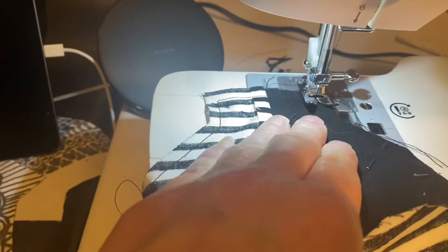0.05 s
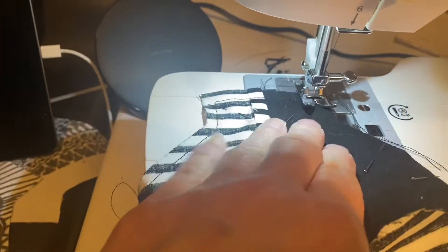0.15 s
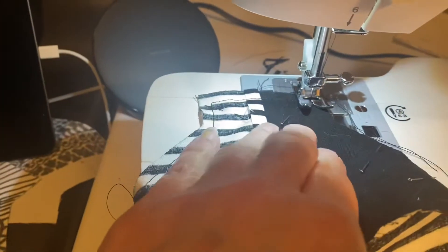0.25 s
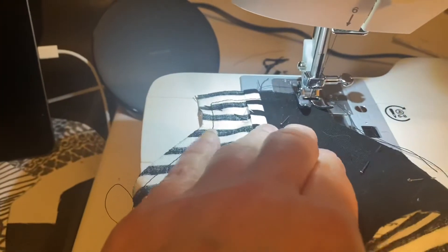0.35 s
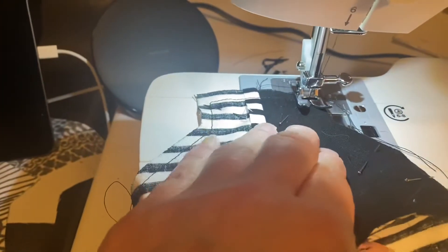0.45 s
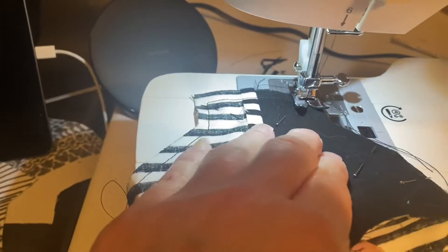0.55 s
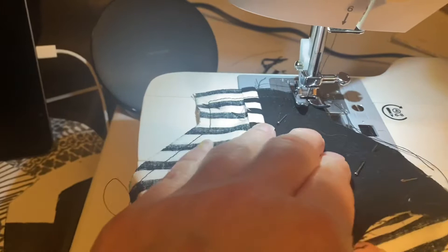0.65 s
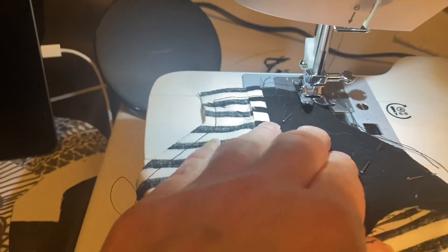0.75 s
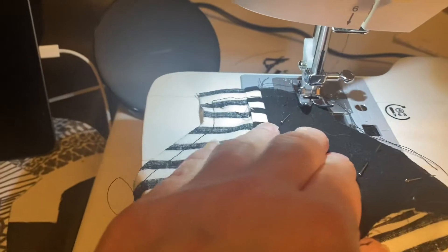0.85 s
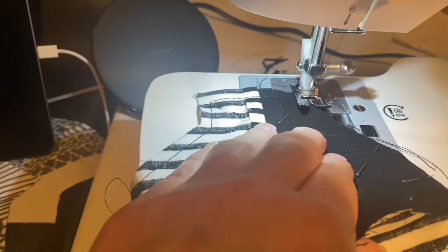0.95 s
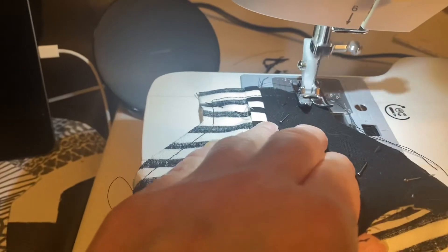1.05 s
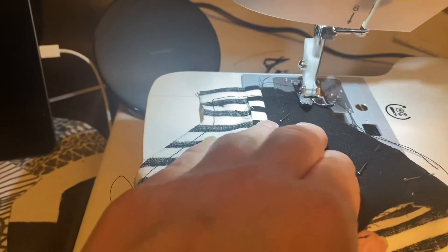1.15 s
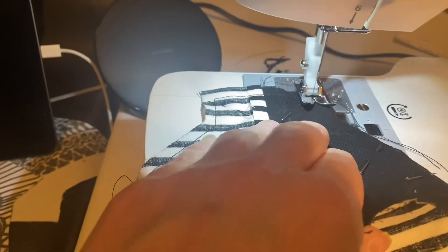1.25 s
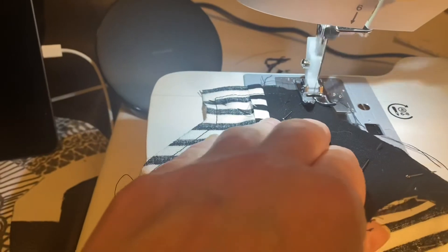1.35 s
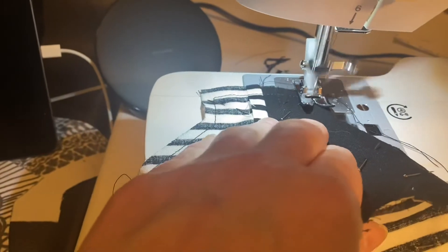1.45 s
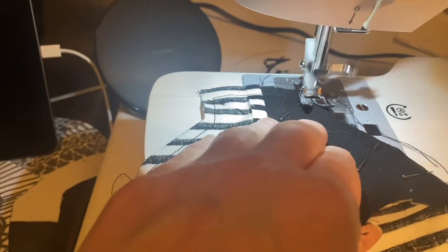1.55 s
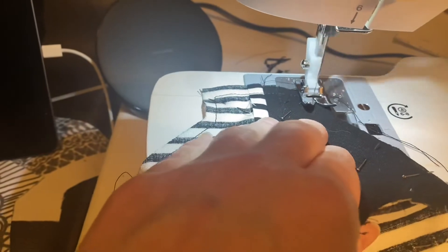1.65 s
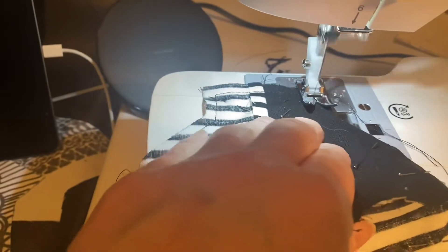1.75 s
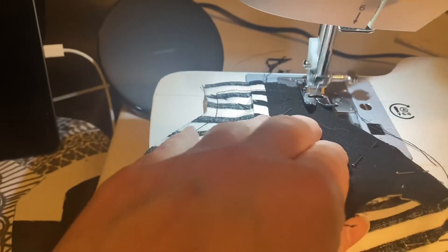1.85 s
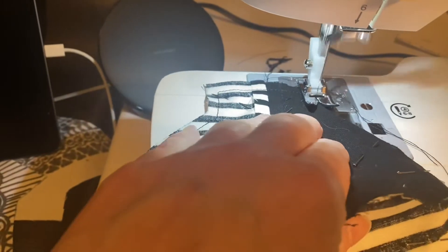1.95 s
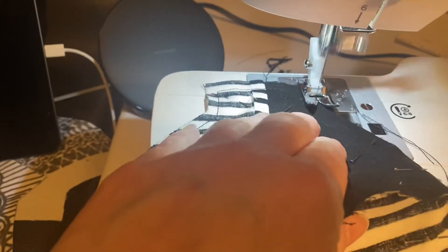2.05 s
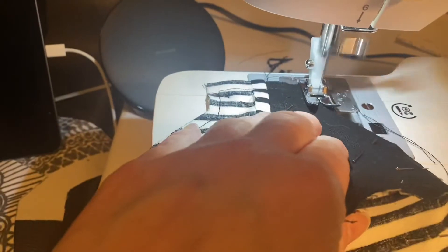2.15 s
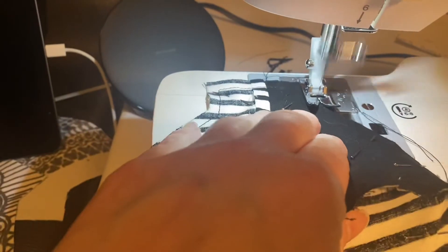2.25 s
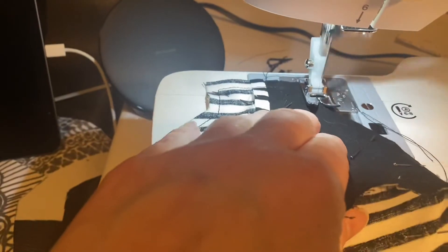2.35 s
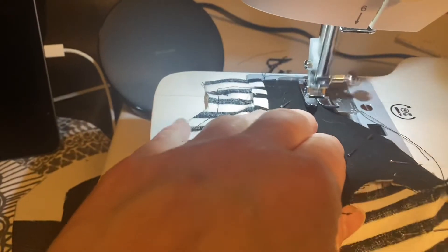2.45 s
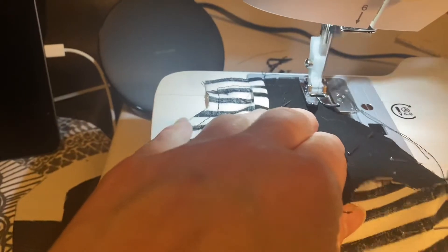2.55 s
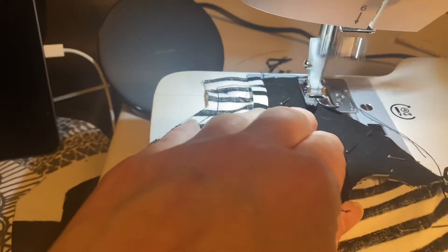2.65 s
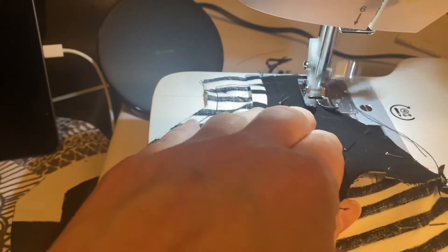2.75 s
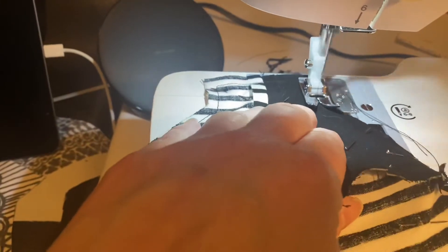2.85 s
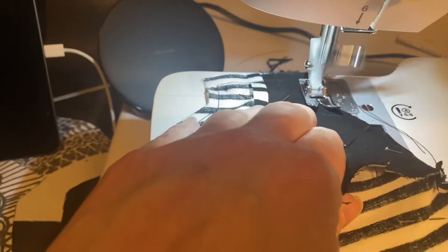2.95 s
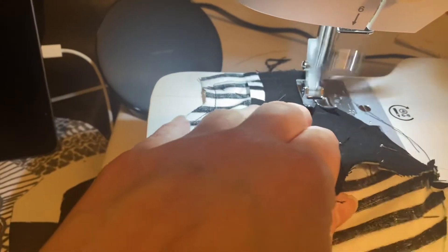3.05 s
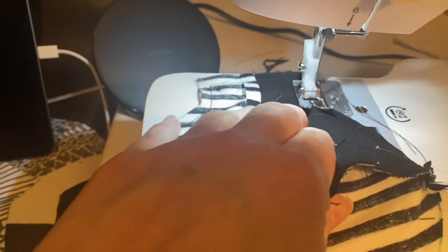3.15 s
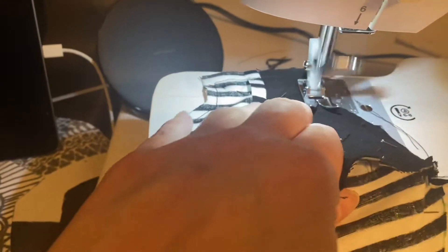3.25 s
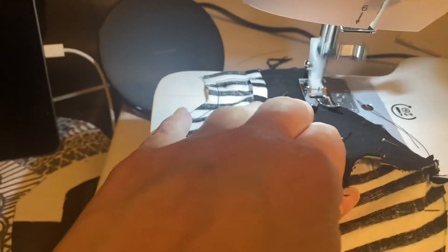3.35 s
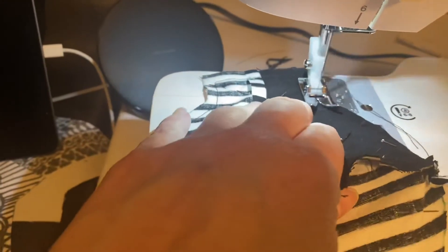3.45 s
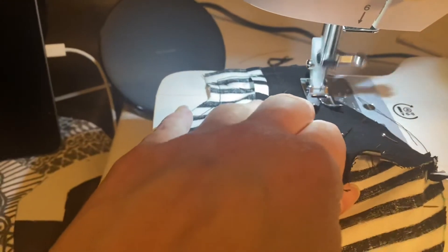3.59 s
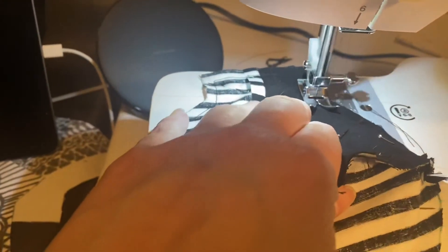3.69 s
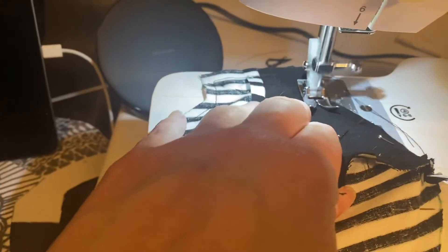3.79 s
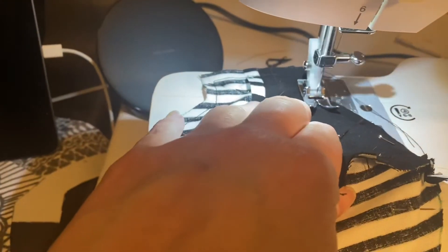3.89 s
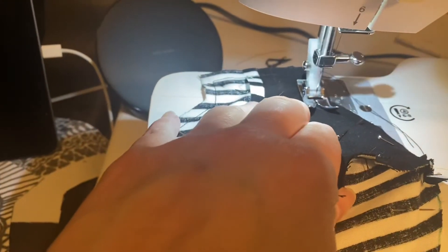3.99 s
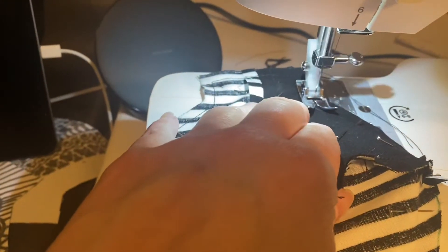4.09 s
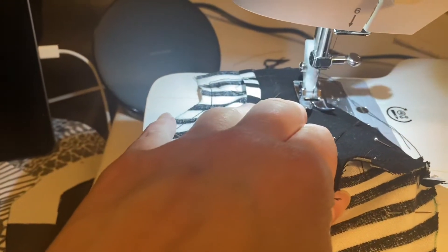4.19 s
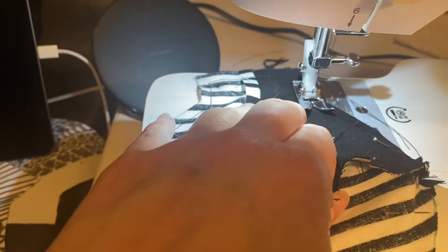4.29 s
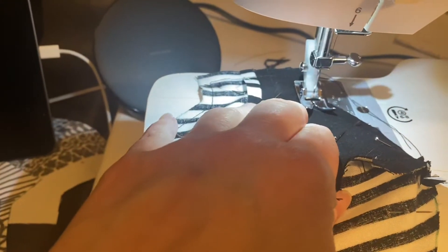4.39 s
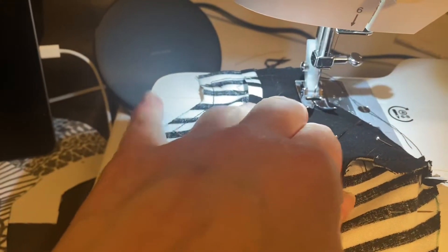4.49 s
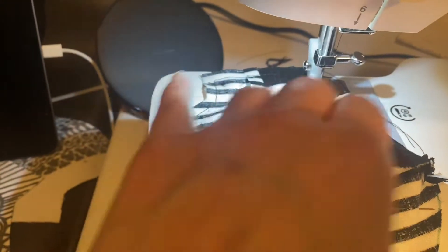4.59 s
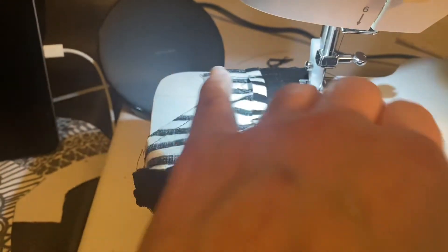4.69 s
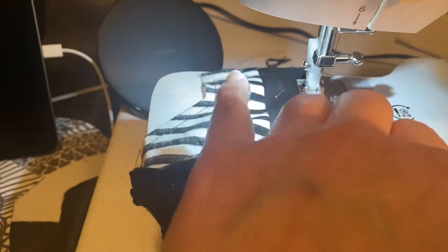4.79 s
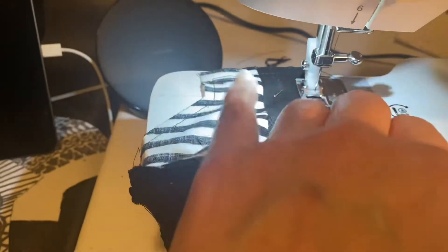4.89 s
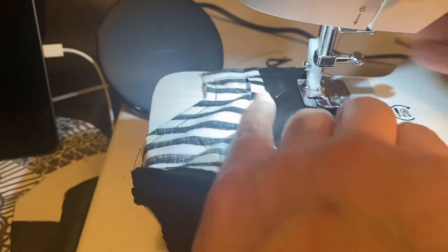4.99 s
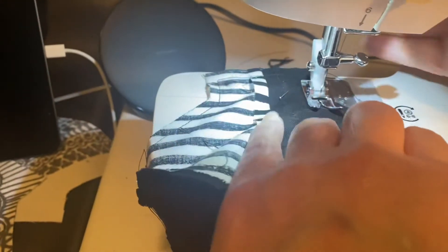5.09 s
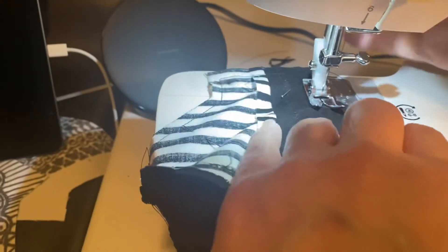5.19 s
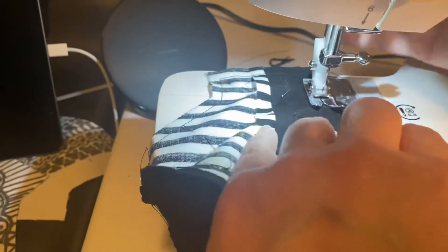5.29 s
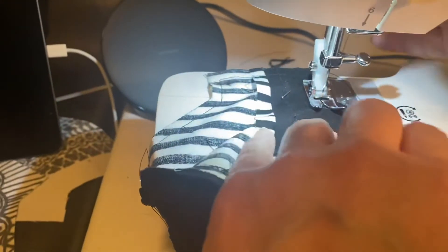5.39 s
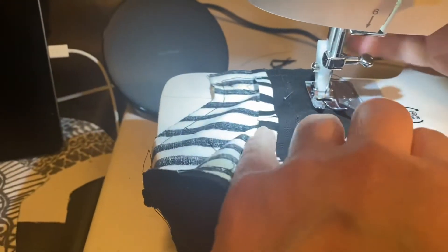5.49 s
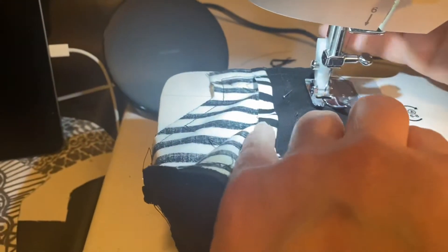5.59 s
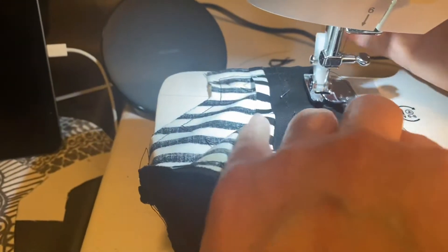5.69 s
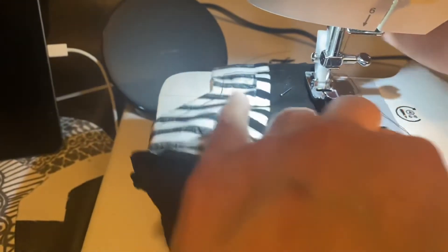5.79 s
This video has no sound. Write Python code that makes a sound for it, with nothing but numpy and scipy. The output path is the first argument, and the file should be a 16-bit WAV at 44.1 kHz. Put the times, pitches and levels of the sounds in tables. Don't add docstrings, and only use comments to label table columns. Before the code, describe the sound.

A domestic sewing machine on a table, heard very near through a phone in stereo. After brief fabric scuffs and a clunk, the motor speeds up with whining gears, buzzing housing and regular mechanical clacks, holds fast briefly, then drops in pitch and stops. Near quiet returns, broken by dull knocks, bright metallic clicks and cloth being handled.

```python
import sys
import numpy as np
from scipy import signal
from scipy.fft import rfft, irfft, next_fast_len
from scipy.io import wavfile
from scipy.ndimage import uniform_filter1d

SR = 44100
rng = np.random.default_rng(int(sys.argv[2]) if len(sys.argv) > 2 else 0)


def how_loud(loudness_db):
    steps = np.asarray(loudness_db, float) / 20
    return 10 ** steps


def master_out(mix):
    frames = np.transpose(np.atleast_2d(mix))
    ceiling = np.clip(frames, -1, 1)
    pcm = np.round(ceiling * 32767).astype(np.int16)
    wavfile.write(sys.argv[1], SR, pcm)


N = 257278

# (time [s], belt tooth rate [Hz])
SPEED_HZ = [(0.6, 80), (0.9, 185), (1.33, 325), (1.62, 345), (1.75, 415), (1.9, 505), (2.02, 645),
            (2.15, 726), (2.37, 779), (2.52, 808), (2.68, 822), (2.88, 819), (2.97, 768), (3.12, 558),
            (3.22, 462), (3.32, 425), (3.6, 208.5), (3.75, 115)]
# (multiple of tooth rate, mains sideband [Hz], level [dB])
BELT_LINES = [(1, 0, 4.5), (1, -60, -9), (1, 120, -9), (.69, 0, -7.5)]
GEAR_LINES = [(1, 120, -7), (1, -60, -1), (2, 0, -3), (2.445, -2, -6), (2.573, 1, 2.5), (2.573, 121, -12),
              (3.37, 0, -4), (3.37, -120, -11)]
# (level [dB], slope [dB per dB of speed], load swing [dB], flutter [dB], rise [s])
HUM = [(-48, 0.12, 5.0, 3.0, 0.35), (-46, 0.08, 1.0, 0.8, 0.08), (-57, .1, 1, 1.5, .05),
       (-60, .1, 1, 1.5, .05)]
# (frequency [Hz], width [Hz], gain [dB])
ARM_MODES = [(335, 50, 5), (445, 60, 6), (660, 80, 4), (790, 160, 5.5)]
# (frequency [Hz], density [dB per Hz])
BODY = [(35, -60.5), (60, -7.5), (108, -3), (173, -2), (318, -0.5), (508, -9.5), (757, -5.5), (1050, -20),
        (2080, -23), (3020, -34.5), (8490, -28.5), (10200, -34.5), (12100, -36), (14800, -29.5),
        (15700, -48)]
# (frequency [Hz], width [Hz], gain [dB])
HOUSING_MODES = [(109.9, 18, 12.5), (213.7, 2.3, 6.5), (285, 36, 5), (330, 32, 6.5), (456.5, 56, 9),
                 (665, 74, 4), (921, 37, 7.5), (1490, 49, 5), (1794, 220, -8.5), (2050, 200, 2),
                 (2680, 180, 5), (3700, 990, 7.5), (4790, 200, 8), (6900, 190, -4)]
# (time [s], tick [dB], clack over tick [dB], clack [Hz], crank thump [dB])
STITCHES = [(1.1007, -40.5, 5, 1320, -36), (1.5569, -28.5, -0.5, 2550, -31),
            (1.8737, -30.5, 3, 1150, -39.5), (2.0891, -32, 2, 1290, -42.5), (2.2638, -35, -8.5, 1490, -18),
            (2.4179, -34, -12, 1540, -14), (2.5728, -33.5, 2, 2096, -15.5), (2.7278, -31.5, -2, 2029, -16),
            (2.8828, -31, -13, 1830, -17), (3.0555, -34, 6.5, 1380, -17), (3.3139, -32, 1, 1150, -39.5)]
# (share of turn, level over main thump [dB], ring [Hz])
CRANKS = [(0.331, -3.5, 275), (.52, 0.5, 313), (.77, -7.5, 290)]
# (time [s], tick [dB], clack over tick [dB], clack [Hz])
LOOSE_PARTS = [(0.84, -62, 17, 2100), (0.853, -55, 14.5, 2100), (0.857, -63, 6, 1490),
               (0.943, -60, 10, 1150), (1.342, -47.5, 8, 1500), (1.623, -44, 6, 1490),
               (2.0796, -38.5, 2.5, 1310), (2.217, -45, 4, 1930), (2.257, -35, 4, 1930),
               (2.2898, -46, -7, 1329), (2.4655, -35, 4, 1650), (3.379, -42, 2, 1493)]
# (time [s], peak [dB], ring [Hz])
THUMPS = [(0.77, -32, 794), (0.84, -26.5, 683), (0.945, -28, 260), (0.973, -25, 275), (1.235, -31.5, 300),
          (1.29, -23, 249), (1.398, -25, 330), (1.708, -16.5, 377), (1.863, -22, 320), (2.412, -21, 338),
          (2.473, -17.5, 278), (3.125, -26, 223), (3.164, -19, 297), (3.239, -27, 494.3),
          (3.433, -23.5, 219)]
# (time [s], peak [dB], clack over peak [dB])
SNAPS = [
    (1.304, -47, -13),
    (1.9507, -33, -2),
    (2.141, -41, -8),
    (2.312, -38.5, 10),
    (2.6265, -36, 10),
    (3.1284, -38.5, -17),
    (3.4531, -37.5, -1),
    (4.74, -60.5, -10),
]
# (frequency [Hz], density [dB per Hz])
SNAP = [(1000, 4), (4000, -1), (10000, -8.5), (16400, -12.5)]
# (time [s], peak [dB], ring [Hz], brightness [dB])
KNOCKS = [(0.137, -42.5, 258, -32), (0.244, -49.5, 160, -17.5), (0.288, -38, 302, -25.5),
          (0.383, -44.5, 308, -22), (0.417, -41, 485, -31), (0.536, -22, 422, -14), (0.551, -26, 285, -18),
          (3.653, -37, 300, -35), (3.742, -48.5, 350, -39), (3.826, -49, 640, -34.5), (3.89, -40, 323, -47),
          (3.998, -52, 320, -40.5), (4.038, -51.5, 460, -36), (4.144, -51, 334, -32.5),
          (4.158, -38.5, 462, -39), (4.181, -43, 322, -25), (4.59, -65, 382, -26), (4.397, -34.5, 266, -24),
          (4.831, -33, 450, -9.5), (4.842, -35, 354, -10), (4.98, -36, 356, -10), (5.067, -45, 330, -34),
          (5.208, -41, 285, -18.5), (5.292, -29, 420, -15), (5.353, -40, 397, -17.5),
          (5.393, -30.5, 485, -14.5), (5.403, -36.5, 157, -42), (5.479, -54.5, 885, -5),
          (5.687, -47.5, 110.4, -37), (5.711, -47, 235, -30), (5.125, -50, 181, -12),
          (4.335, -52, 346, -22)]
# (frequency [Hz], density [dB per Hz])
KNOCK = [(47, -30.5), (80, -7.5), (454, -9.5), (1730, -23.5), (2580, -25.5), (6870, -37), (8390, -32),
         (10700, -47), (12000, -38.5), (14900, -43), (15800, -77)]
# (frequency [Hz], width [Hz], gain [dB])
LEVER_MODES = [(1150, 53, -0.5), (1750, 70, -3), (2564, 74, 6.5), (3870, 250, 0), (4760, 120, 2)]
TABLE_MODES = [(330, 20, 8), (475, 25, 4)]
# (frequency [Hz], peak [dB], t60 [s])
SPRING_MODES = [(3450, -63, .2), (3741, -63, .28), (3833, -60, .22), (4231, -58, .3), (4650, -64, .2),
                (4867, -64, .22), (5168, -55, .34), (5421, -57, .26), (5650, -63, .24), (6019, -67, .18),
                (6621, -61, .13), (7321, -63, .12)]
# (time [s], frequency [Hz], peak [dB], t60 [s])
PINGS = [(0.537, 472.6, -29, 0.16), (0.858, 1490, -39.5, 0.043), (0.549, 312, -30, 0.14),
         (1.342, 477, -31, 0.09), (3.233, 435, -37, 0.17), (3.315, 626, -36, 0.085),
         (3.656, 652, -48, 0.053), (3.826, 642, -43.5, .06), (3.827, 910, -64.5, .4),
         (4.395, 1710, -46, 0.056), (4.4, 1100, -52, .1), (4.245, 2050, -72, 0.081),
         (4.4, 267, -42.5, 0.14), (4.41, 440, -50.5, .12), (4.002, 330, -46.5, 0.11),
         (4.162, 443, -45.5, 0.073), (4.832, 997, -39, 0.067), (4.83, 1186, -40, 0.049),
         (4.84, 568, -40, 0.13), (4.841, 2290, -43, 0.045), (4.845, 2570, -40, 0.041),
         (4.84, 3500, -51, 0.07), (4.847, 323.4, -41, .3), (4.832, 406, -39, 0.12),
         (4.832, 1920, -48, 0.063), (4.976, 1233, -36.5, 0.046), (4.977, 2562, -39.5, 0.064),
         (4.978, 3850, -45, 0.049), (4.978, 4270, -46, 0.04), (4.993, 337, -43.5, 0.12),
         (5.291, 1370, -38, 0.028), (5.291, 2590, -42, 0.042), (5.292, 4200, -56, .045),
         (5.297, 435, -33.5, .08), (5.303, 424, -23.5, 0.051), (5.31, 326.4, -38, 0.11),
         (5.353, 2550, -57, 0.043), (5.352, 4000, -48, .03), (5.393, 3760, -36.5, 0.025),
         (5.394, 2140, -49, 0.044), (5.392, 3040, -40, 0.036), (5.48, 1224, -50.5, 0.066),
         (5.654, 2010, -49, 0.045)]
# (time [s], peak [dB])
TICKS = [(0.535, -49.5), (0.55, -35.5), (3.655, -55), (3.743, -69), (3.889, -72), (4.18, -62), (4.339, -70),
         (4.83, -48.5), (5.292, -37.5), (5.351, -40), (5.386, -40.5), (5.394, -31.5), (5.48, -53)]
# (time [s], level [dB])
CLOTH_DB = [
    [(0.0, 3), (0.25, -3), (0.36, -0.5), (0.51, -6), (0.62, 3.5)],
    [(3.7, -22), (3.79, -12), (4.2, -17.5), (4.36, -6.5), (4.55, -12.5), (4.84, -9), (4.95, 1.5),
     (5.35, -2), (5.83, -4.5)],
]
# (start [s], length [s], rub [dB], drag [dB], rustle [dB])
SCUFFS = [(0.0, 0.037, -50, -67, -100), (0.423, 0.073, -44, -89, -102), (0.522, 0.039, -49, -37, -58),
          (0.579, 0.11, -56, -50, -92), (3.837, 0.4, -69.5, -104, -102), (0.932, 0.053, -78, -76, -76),
          (4.118, 0.12, -59, -66.5, -90), (4.205, 0.067, -51.5, -75, -101),
          (4.295, 0.098, -57.5, -69.5, -82), (4.397, 0.12, -52, -67, -99), (4.779, 0.048, -93, -76, -55),
          (4.807, 0.065, -67.5, -47, -52), (4.96, 0.071, -54, -87, -66), (5.487, 0.056, -61, -64, -86),
          (5.524, 0.12, -63, -54.5, -73), (5.617, 0.07, -72, -56, -58.5), (5.755, 0.12, -90, -57, -72)]
# (frequency [Hz], density [dB per Hz])
RUB = [(47, -60), (80, 2), (255, 5.5), (364, -8.5), (475, -11), (829, -27.5), (8210, -32), (10300, -32),
       (12300, -40), (14800, -25.5), (15700, -54.5)]
# (start [s], length [s], level [dB])
BUMPS = [(1.83, 0.12, -66), (2.41, 0.089, -62), (3.115, 0.09, -59), (4.68, 0.086, -70), (4.81, 0.13, -48.5),
         (5.66, 0.088, -66)]
# (frequency [Hz], density [dB per Hz])
RUMBLE = [(20, -45), (35, -17), (52, 0), (70, -5), (100, -20), (200, -55)]
# (frequency [Hz], phase [rad])
PORT_PHASE_RAD = [(0, 0), (2150, -.9), (2840, 1.6), (4740, .7), (5250, 2.4), (6460, -5.9), (7900, -9.0),
                  (8800, -10), (9730, -12.4), (10600, -12.8), (11600, -15.2), (12700, -16.2), (13400, -18),
                  (16100, -22.2)]
# (frequency [Hz], level [dB])
PORT_BALANCE_DB = [(60, 3.5), (110, -1), (200, -3), (380, -5), (700, -1), (1290, -2), (2380, 2.5),
                   (4400, 0.5), (8120, 2.5), (15000, -1.5)]
# (frequency [Hz], level [dB])
WIDTH_DB = [(30, -3), (60, -19), (150, -17), (300, -13), (700, -6), (1500, -3), (4000, -2), (6500, -7),
            (8000, -18), (16000, -16)]

T = np.arange(N) / SR
FULL_HZ, TEETH_PER_STITCH = 820, 128
TOOTH_HZ = np.interp(T, *np.transpose(SPEED_HZ))
TURNS = np.cumsum(TOOTH_HZ) / SR / TEETH_PER_STITCH
TORQUE_HZ = 120
ON_S, OFF_S, START_S, STOP_S = 0.5, 3.7, 0.21, 0.081
# (level at full speed [dB], slope [dB per dB of speed])
RATTLE, CLATTER, HISS = (-37.5, 1.184), (-44.5, 1), (-53, 1.5)
BELT, GEAR, SHAKE = (-51, 0.1), (-47.5, 7.5), (-69.5, 0.76)
# (level at 0 dB in CLOTH_DB [dB], slope [dB per dB of CLOTH_DB])
CLOTH_LAYERS = (-59, 1.5), (-62.5, 1.8), (-71.5, 1.5)
BELT_FROM_HZ, GEAR_IDLE_DB = 308, -62
LOAD_AT_TURN, HISS_SWING_DB = 0.42, 2
SLACK_DB, COAST_DB, COAST_HZ_PER_S = -0.5, -4, 900
SLOW_ROUGH_DB, SLOW_WOBBLE = 5, 0.03
ATTACK_S, PUSH_S = 0.0007, 0.015
TICK_T60_S, THUMP_T60_S, KNOCK_T60_S = 0.048, 0.066, 0.078
SPRING_S, SPRING_DB, SPRING_T60_S = 4.396, -45, 0.28
SCRAPE_S, SCRAPE_DB, SCRAPE_T60_S = 0.93, -46, 0.22
CATCH_DB = -1
BRUSH_HZ, BRUSH_WIDTH_HZ, BRUSH_DB = 4260, 440, -76
STILL_DB, STILL_SWING_DB = -70, -1.5
ROOM_T60_S, ROOM_DB = 0.19, -1
TOP_HZ = 16600


def level(x, db):
    return x * how_loud(db) / np.sqrt(np.mean(x ** 2))


def peak(x, db):
    return how_loud(db) * x / abs(x).max()


def bins(size):
    return np.fft.rfftfreq(size, 1 / SR) + 1e-3


def spectrum_db(points, hz):
    point_hz, db = np.transpose(points)
    return np.interp(np.log(hz), np.log(point_hz + 1e-3), db)


def modes_db(modes, hz):
    return sum(gain / (1 + (2 * (hz - f) / width) ** 2) for f, width, gain in modes)


def colour(x, points, modes=(), lo_hz=1., hi_hz=1e5):
    size = next_fast_len(x.shape[-1] + 4096)
    hz = bins(size)
    db = spectrum_db(points, hz) + modes_db(modes, hz)
    edges = 0.5 * np.log((1 + (lo_hz / hz) ** 6) * (1 + (hz / hi_hz) ** 6))
    cepstrum = irfft(db * np.log(10) / 20 - edges, size)
    cepstrum[1:size // 2] *= 2
    cepstrum[size // 2 + 1:] = 0
    return irfft(rfft(x, size) * np.exp(rfft(cepstrum)), size)[..., :x.shape[-1]]


def curve(rows, quiet_db=-120):
    s, db = np.transpose(rows)
    return np.interp(T, s, db, quiet_db, quiet_db)


def walk(rate_hz):
    hold = int(SR / rate_hz)
    steps = np.repeat(rng.standard_normal(N // hold + 1), hold)
    return 1.118 * uniform_filter1d(steps, hold)[:N]


def swell(s, length_s):
    return np.sin(np.pi * np.clip((T - s) / length_s, 0, 1)) ** 2


def grains(rate_hz, spread_db):
    size = how_loud(spread_db * np.minimum(rng.exponential(size=N), 3))
    clicks = (rng.random(N) < rate_hz / SR) * rng.standard_normal(N) * size
    return clicks + rng.standard_normal((2, N))


def burst(t60_s, push_s):
    t = T[:9000]
    unevenness = how_loud(2.2 * np.repeat(rng.standard_normal(90), 100))
    contacts = rng.standard_normal(len(t)) * unevenness
    decay = how_loud(-60 * np.maximum(t - push_s, 0) / max(t60_s, 0.005))
    return contacts * np.minimum(t / ATTACK_S, 1) * decay


def ping(hz, db, t60_s):
    t = T[:20000]
    flutter_db, drift_rad = 3.5 * walk(90)[:len(t)], 0.9 * walk(70)[:len(t)]
    envelope = how_loud(db + flutter_db - 60 * t / max(t60_s, 0.01)) * np.minimum(t / 0.0015, 1)
    return envelope * np.sin(2 * np.pi * hz * t + drift_rad)


def add(out, s, x):
    i = int(s * SR)
    out[i:i + len(x)] += x[:N - i]


def running():
    return np.clip(np.minimum((T - ON_S) / START_S, (OFF_S - T) / STOP_S + 1), 0, 1) ** 2


def slowing():
    hz_per_s = uniform_filter1d(np.gradient(TOOTH_HZ) * SR, size=4000, origin=1500)
    return np.clip(-hz_per_s / COAST_HZ_PER_S, 0, 1)


def by_speed(db, slope):
    return db + slope * 20 * np.log10(TOOTH_HZ / FULL_HZ)


def cycle():
    at = np.interp(np.transpose(STITCHES)[0], T, TURNS)
    return TURNS - np.interp(TURNS, at, at - np.arange(len(at)))


def floor():
    gain = how_loud(STILL_DB + STILL_SWING_DB * walk(12)) + running() * how_loud(by_speed(*SHAKE))
    gain = gain + sum(how_loud(db) * swell(s, length_s) for s, length_s, db in BUMPS)
    return gain * level(colour(rng.standard_normal((2, N)), RUMBLE, (), 0.93, 300), -1.9)


def cloth():
    cloth_db = np.maximum(*map(curve, CLOTH_DB))
    gains = how_loud(np.array([db + slope * cloth_db for db, slope in CLOTH_LAYERS]))
    for s, length_s, *db in SCUFFS:
        gains = gains + how_loud(np.array(db))[:, None] * swell(s, length_s)
    rub = colour(how_loud(5.3 * walk(25)) * grains(280, 2.0), RUB, TABLE_MODES, 54, 680)
    drag = colour(how_loud(2.9 * walk(39)) * grains(500, 2), RUB, LEVER_MODES, 687, 2040)
    rustle = colour(how_loud(1.5 * walk(35)) * grains(600, 5), RUB, LEVER_MODES, 3000)
    return gains[0] * level(rub, 0.15) + gains[1] * level(drag, 0.15) + gains[2] * level(rustle, 0.34)


def knocks():
    out = np.zeros(N)
    for s, db, hz, bright_db in KNOCKS:
        blow = burst(KNOCK_T60_S, PUSH_S)
        blow[40] += 5.0
        panel = colour(blow, KNOCK, [(hz, 60, 9)] + TABLE_MODES + LEVER_MODES, 0.5 * hz, 1160)
        edge = colour(burst(0.34 * KNOCK_T60_S, 0.5 * PUSH_S), KNOCK, LEVER_MODES, 1200)
        add(out, s - 0.002, peak(panel, db))
        add(out, s - 0.001, peak(edge, db + bright_db + 12.0))
    spring = colour(burst(SPRING_T60_S, 0.013), SNAP, LEVER_MODES, 5400, 6150)
    add(out, SPRING_S, peak(spring, SPRING_DB))
    return out


def rings():
    out = np.zeros(N)
    for s, *mode in PINGS + [(SPRING_S - 0.002, *mode) for mode in SPRING_MODES]:
        add(out, s, ping(*mode))
    for s, db in TICKS + [(row[0], row[1] + CATCH_DB) for row in STITCHES]:
        tick = colour(burst(0.01, 0.001), SNAP, LEVER_MODES + [(14500, 3500, 11)], 1500)
        add(out, s, peak(tick, db))
    scrape = colour(burst(SCRAPE_T60_S, 0.01), SNAP, [(6350, 440, 5)], 3400, 6800)
    add(out, SCRAPE_S, peak(scrape, SCRAPE_DB))
    return out


def brushes():
    hiss = how_loud(2 * walk(30)) * rng.standard_normal(N)
    hiss = colour(hiss, SNAP, [(BRUSH_HZ, BRUSH_WIDTH_HZ, 14)], 3800, 4800)
    return running() * level(hiss, BRUSH_DB)


def housing():
    torque = np.cos(2 * np.pi * TORQUE_HZ * T)
    low = how_loud(0.62 * walk(30.47)) * (1 + 0.5 * torque) * grains(250, 3.4)
    low = level(colour(low, BODY, HOUSING_MODES, 107.5, 980), 1.0)
    mid = how_loud(1.83 * walk(30.004)) * (1 + 0.093 * torque) * grains(600, 7.5)
    mid = level(colour(mid, BODY, HOUSING_MODES, 1060, 2730), 3.27)
    top = level(colour(how_loud(1.6 * walk(45)) * grains(900, 4), BODY, HOUSING_MODES, 3000), 1.16)
    top_db = by_speed(*HISS) + HISS_SWING_DB * np.cos(2 * np.pi * (cycle() - 0.15))
    mix = how_loud(by_speed(*RATTLE)) * low + how_loud(by_speed(*CLATTER)) * mid + how_loud(top_db) * top
    return running() * how_loud(SLACK_DB * slowing()) * mix


def whine_lines(rows, turn_rad):
    return sum(how_loud(db + 2.8 * walk(22)) * np.sin(multiple * turn_rad + 2 * np.pi * side_hz * T)
               for multiple, side_hz, db in rows)


def winding_hum(load):
    hum = np.zeros(N)
    for k, (db, slope, swing_db, flutter_db, rise_s) in enumerate(HUM):
        gain = how_loud(by_speed(db, slope) + swing_db * load + flutter_db * walk(25.16))
        rise = np.clip((T - ON_S) / rise_s, 0, 1) ** 2
        phase_rad = 2 * np.pi * (k + 1) * TORQUE_HZ * T + 0.35 * flutter_db * walk(14)
        hum += gain * rise * np.sin(phase_rad)
    return hum


def motor():
    slack = np.clip(0.85 - TOOTH_HZ / FULL_HZ, 0, 0.4) * 2.5
    load = np.cos(4 * np.pi * (cycle() - LOAD_AT_TURN))
    rough_db = (1.5 + SLOW_ROUGH_DB * slack) * walk(40)
    belt = how_loud(by_speed(*BELT) + modes_db(ARM_MODES, TOOTH_HZ) + rough_db)
    belt = belt / (1 + (BELT_FROM_HZ / TOOTH_HZ) ** 12)
    gear = how_loud(by_speed(*GEAR)) + how_loud(GEAR_IDLE_DB)
    wobble = (0.003 + SLOW_WOBBLE * slack) * walk(30)
    turn_rad = 2 * np.pi * np.cumsum(TOOTH_HZ * (1 + wobble)) / SR
    mix = belt * whine_lines(BELT_LINES, turn_rad) + gear * whine_lines(GEAR_LINES, turn_rad)
    return running() * how_loud(COAST_DB * slowing()) * (mix + winding_hum(load))


def stitches():
    out, count = np.zeros(N), cycle()
    for s, db, clack_db, hz in [row[:4] for row in STITCHES] + LOOSE_PARTS:
        tick = colour(burst(TICK_T60_S, 0.0051), BODY, HOUSING_MODES, 2360)
        clack = colour(burst(0.085, 0.0019), SNAP, [(hz, 120, 9)], 930, 2780)
        add(out, s, peak(tick, db))
        add(out, s, peak(clack, db + clack_db))
    cranks = [(np.interp(k + at, count, T), row[4] + db, hz)
              for k, row in enumerate(STITCHES) for at, db, hz in CRANKS]
    for s, db, hz in cranks + THUMPS:
        thump = colour(burst(THUMP_T60_S, 0.002), BODY, HOUSING_MODES + [(hz, 40, 8)], 158, 820)
        add(out, s, peak(thump, db - 10.5))
    for s, db, clack_db in SNAPS:
        snap = colour(burst(0.008, 0.001), SNAP, [(14500, 3500, 12)], 3000)
        clack = colour(burst(0.027, 0.0017), SNAP, LEVER_MODES, 800, 3600)
        add(out, s, peak(snap, db + 5))
        add(out, s, peak(clack, db + clack_db))
    return out


def scene():
    near, far = floor() + cloth() + housing()
    near = near + knocks() + rings() + brushes() + motor() + stitches()
    size = next_fast_len(N + SR)
    hz = bins(size)
    side = np.array([[0.5], [-0.5]])
    lag = np.exp(1j * side * np.interp(hz, *np.transpose(PORT_PHASE_RAD)))
    width_db = spectrum_db(WIDTH_DB, hz)
    tail = rng.standard_normal((2, SR // 4)) * how_loud(-60 * T[:SR // 4] / ROOM_T60_S)
    tail = tail / np.sqrt(np.sum(tail ** 2, axis=1, keepdims=True))
    echoes = rfft(tail, size) * how_loud(width_db + ROOM_DB)
    near = rfft(near, size) * (lag + echoes)
    far = rfft(far, size) * how_loud(width_db) * 2 * side * lag
    balance = how_loud(side * spectrum_db(PORT_BALANCE_DB, hz))
    return irfft(balance * (near + far) / (1 + (hz / TOP_HZ) ** 80), size)[:, :N]


def band_limit(x):
    return signal.sosfilt(signal.butter(12, 16520, fs=SR, output="sos"), x)


def record(dry):
    return band_limit(dry)


dry = scene()
out = record(dry)
master_out(out)
```